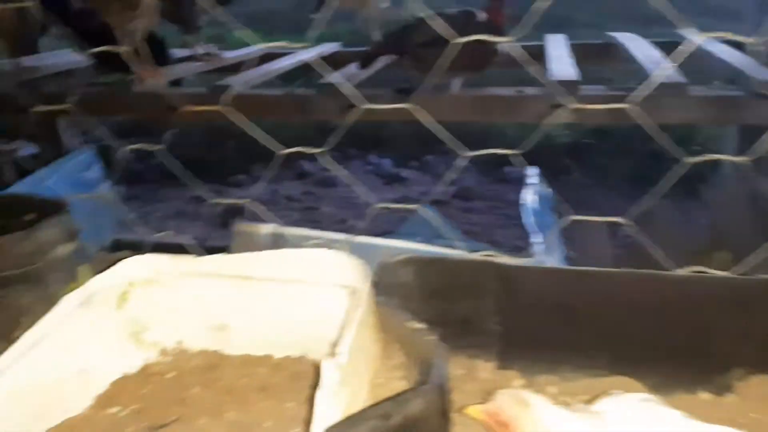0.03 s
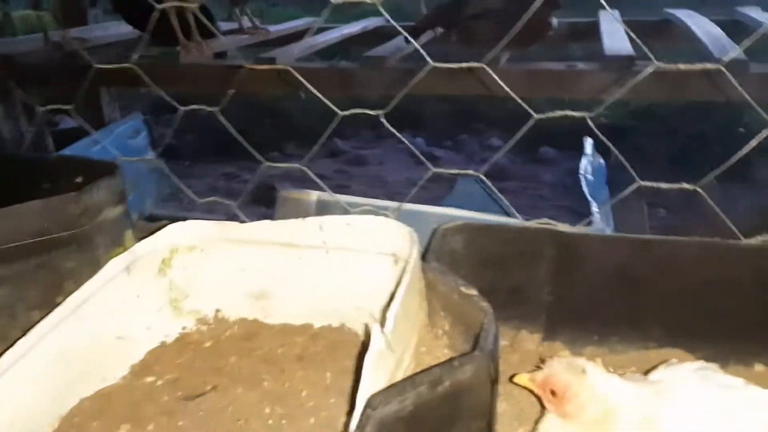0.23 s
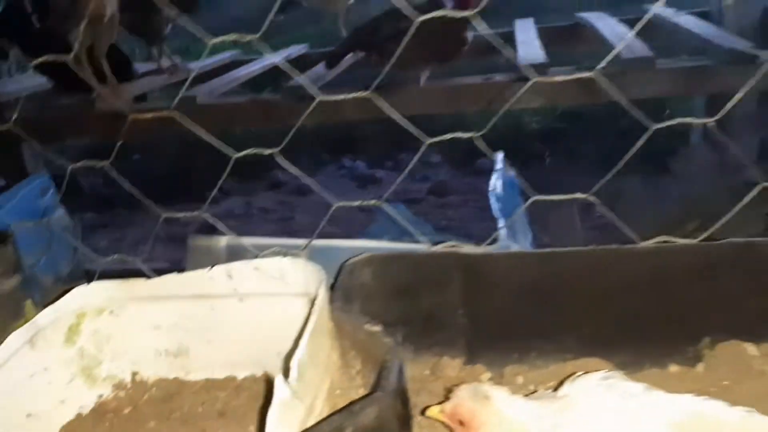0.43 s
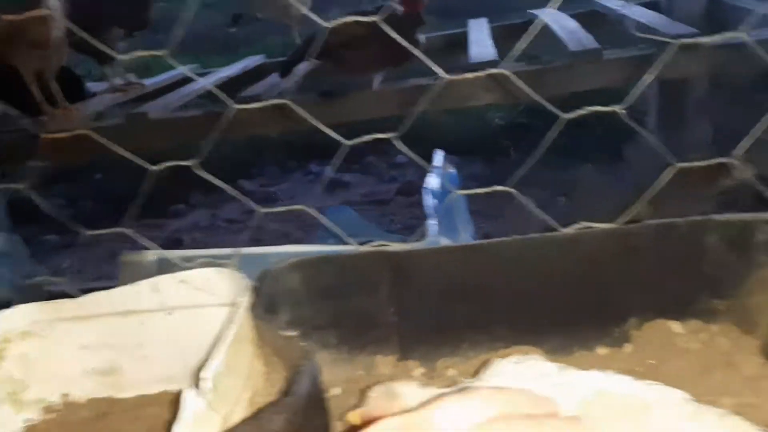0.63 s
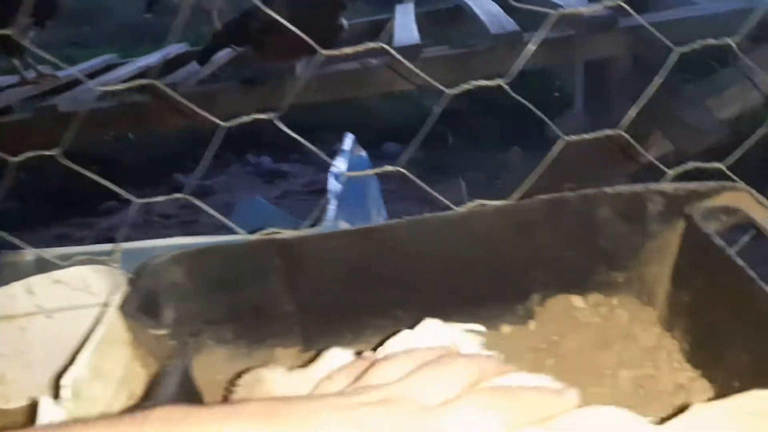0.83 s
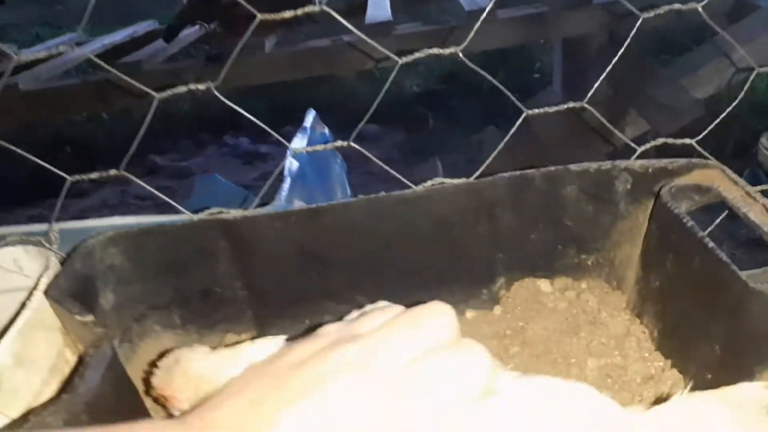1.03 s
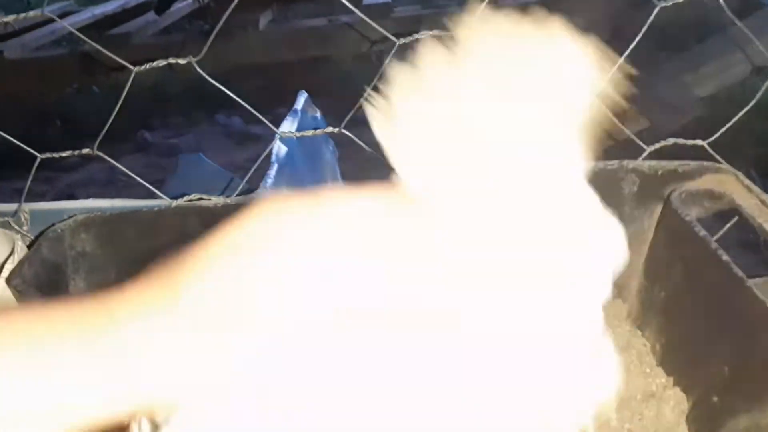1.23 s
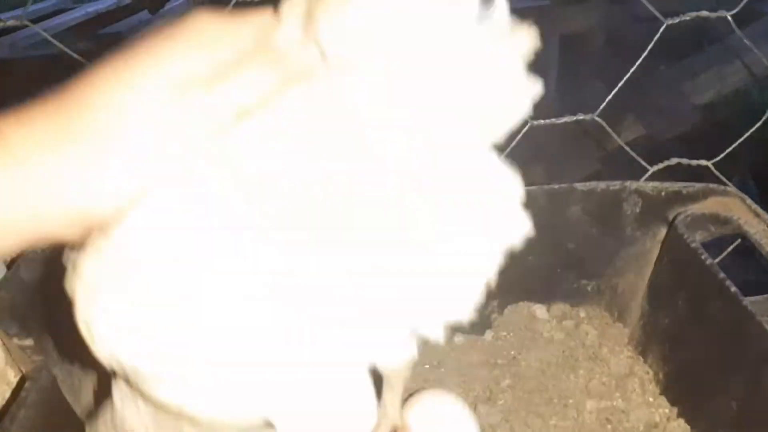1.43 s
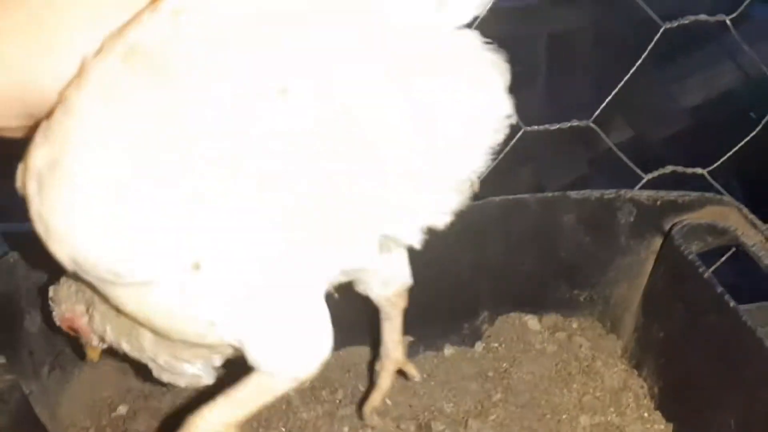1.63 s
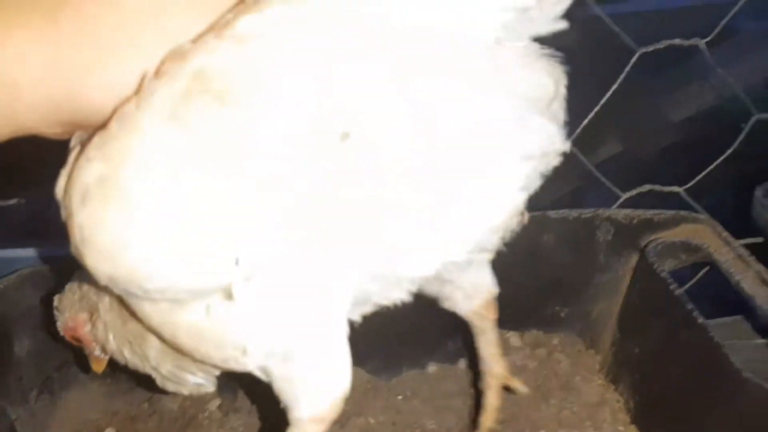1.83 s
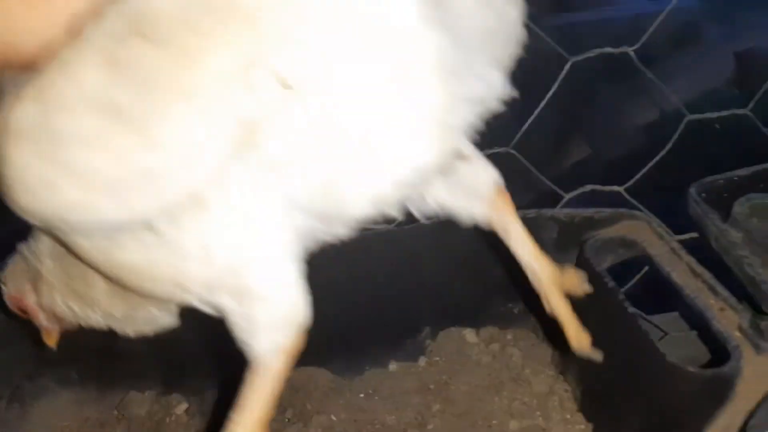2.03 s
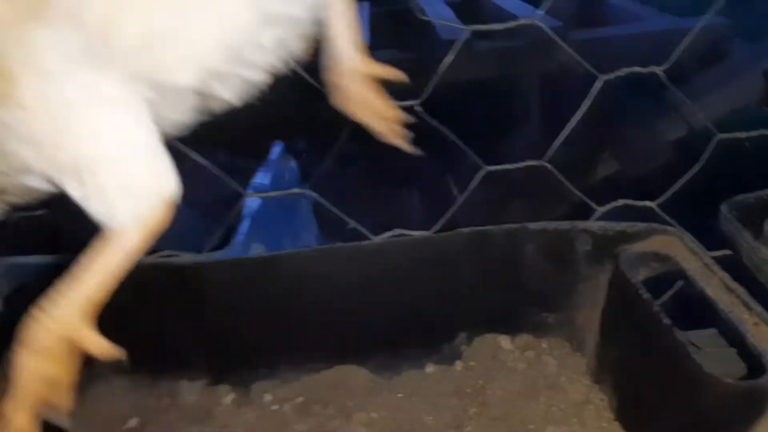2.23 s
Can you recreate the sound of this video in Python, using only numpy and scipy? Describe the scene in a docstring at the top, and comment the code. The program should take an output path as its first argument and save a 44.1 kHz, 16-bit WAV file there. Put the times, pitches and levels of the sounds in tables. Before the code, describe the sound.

A hen, close up: the tail of a low cluck on the left at 0 s, then a soft, high stuttering whine from 0.1 s, smoothing into a wavering moan until 1.0. Harsh, loud, lower trilling squawks burst out at 1.2-1.65 and 1.95-2.3. Litter rustles, strongest near 1.45, with low handling rumble, faint plastic knocks and grit ticks. Distant insects and a faint pulsing cricket surround the small, dry coop.

```python
"""A coop at night: a hen in a plastic nest tray whines in stutters, then squawks harshly twice as a hand pushes her.
Her voice is a stack of overtones on a pitch that dips about fifty times a second, with rasp and breath noise.
A low cluck ends nearby, made of two sine waves. Shaped noise makes the litter rustle and the handling rumble;
fading sine waves make the tray knock, and short noise bursts are grit.
Outside, noise bands make distant insects and air, and a pulsing narrow band is a nearer cricket."""
import sys
import numpy as np
from scipy import signal
from scipy.fft import rfft, irfft, next_fast_len
from scipy.io import wavfile
from scipy.ndimage import uniform_filter1d, map_coordinates

SR = 44100
rng = np.random.default_rng(int(sys.argv[2]) if len(sys.argv) > 2 else 0)


def to_wav(s):
    """Save 16-bit WAV."""
    ch = np.atleast_2d(s).T  # columns
    pcm = np.round(np.clip(ch, -1, 1) * 32767)  # PCM
    wavfile.write(sys.argv[1], SR, pcm.astype(np.int16))


N = 100503  # length in samples
TIME = np.arange(N) / SR  # seconds
TOP_HZ = 15830  # nothing sounds above this


def amp(db):
    """Turn decibels into a gain."""
    return 10 ** (np.asarray(db) / 20)


def unit(x):
    """Scale a sound to an rms level of 1."""
    return x / np.sqrt(np.mean(x ** 2) + 1e-20)


def along(points, hz):
    """Read a (frequency, value) table on a log axis; below its first point the value is 30 less."""
    f, v = np.transpose(points)
    return np.interp(np.log(hz + 1), np.log(f + 1), v, left=v[0] - 30)


def curves(rows):
    """One value per sample for each column after the time, joined by straight lines."""
    s, *columns = np.transpose(rows)
    return [np.interp(TIME, s, column) for column in columns]


def wobble(rate):
    """A smooth random curve with `rate` random points a second."""
    points = rng.standard_normal(int(N * rate / SR) + 4)
    return map_coordinates(points, [np.arange(N) * rate / SR])


def filtered(x, response):
    """Change the loudness of each frequency by a response curve."""
    m = next_fast_len(N + SR // 2)
    hz = np.fft.rfftfreq(m, 1 / SR)
    return irfft(rfft(x, m) * response(hz), m)[..., :N]


def noise(spectrum, alike=1):
    """Stereo noise of rms 1; alike is how much left resembles right (1 = the same)."""
    turn = np.arccos(np.clip(alike, -1, 1)) / 2
    shaped = filtered(rng.standard_normal((2, N)), lambda hz: amp(along(spectrum, hz)))
    mid, side = shaped * [[np.cos(turn)], [np.sin(turn)]]
    return unit(np.array([mid + side, mid - side]))


def placed(x, lag_ms, pan_db):
    """Place a sound sideways: the right side lags, and the left is louder by pan_db."""
    n, half = np.arange(N), lag_ms * SR / 2000
    left = map_coordinates(x, [n + half], mode="nearest")
    right = map_coordinates(x, [n - half], mode="nearest")
    return np.array([amp(pan_db / 2) * left, amp(-pan_db / 2) * right])


# Tone colour of the distant night: (frequency [Hz], level [dB])
NIGHT_COLOUR = [(240, -55), (400, 0), (620, -26), (3330, -20.5), (4600, -5.5), (5360, -4), (6750, -2.5),
                (8900, -24.5), (15000, -15), (15700, -14)]
# Slow rise of the night: (time [s], added level [dB])
NIGHT_SWELL = [(0, 0.5), (2.28, 4.5)]
NIGHT_DB = -58  # level before the swell


def distant_night():
    """Distant insects and air: unsteady noise, almost unrelated on the two sides."""
    swell_db, = curves(NIGHT_SWELL)
    return amp(NIGHT_DB + swell_db + 1.9 * wobble(27.36)) * noise(NIGHT_COLOUR, alike=0.033)


# Loudness of the nearer cricket: (time [s], level [dB])
CRICKET_LEVEL = [(.98, -73), (1.0, -57), (1.17, -56), (1.2, -74), (2.05, -56)]
CRICKET_HZ, CRICKET_WIDTH_HZ, PULSE_HZ = 6200, 40, 68.9  # pitch, spread to each side, pulses per second


def cricket():
    """A nearer cricket: a narrow band of noise opened and closed by regular pulses."""
    level_db, = curves(CRICKET_LEVEL)
    band = filtered(rng.standard_normal((2, N)),
                    lambda hz: np.exp(-((hz - CRICKET_HZ) / CRICKET_WIDTH_HZ) ** 2))
    pulses = np.cos(np.pi * PULSE_HZ * TIME) ** 2
    return amp(level_db) * unit(band * pulses)


# How long the walls ring: (frequency plus 300 [Hz], time to fall 60 dB [s])
COOP_RING = [(300, 0.17), (9000, 0.07)]


def coop(x):
    """The short answer of the coop walls: the sound smeared by noise whose treble fades sooner."""
    hz, t, grid = signal.stft(rng.standard_normal((2, SR // 4)), SR, nperseg=256)
    fall_s = np.abs(along(COOP_RING, hz + 300))[:, None]
    tail = signal.istft(grid * amp(-60 * t / fall_s), SR, nperseg=256)[1]
    later = np.pad(x, (130, 0))[None]  # the answer starts 130 samples late
    return signal.fftconvolve(later, tail / np.linalg.norm(tail[0]), axes=1)[:, :N]


# Movement in the tray: (time [s], litter level [dB], handling rumble level [dB])
RUSTLE_LEVELS = [(.06, -52.5, -65), (.75, -62, -66), (.85, -74, -70), (1.1, -55.5, -71.5),
                 (1.17, -59.5, -55), (1.25, -59, -67), (1.4, -47, -62), (1.47, -44, -54.5),
                 (1.66, -57.5, -60), (1.72, -79, -70.5), (2.0, -63, -73), (2.28, -53, -57)]
# Tone colour of the litter: (frequency [Hz], level [dB])
LITTER_COLOUR = [(150, -35), (260, -2.5), (380, 0), (600, -6), (1200, -10), (3000, -22.5)]
# Tone colour of the handling rumble: (frequency [Hz], level [dB])
RUMBLE_COLOUR = [(25, -45.5), (70, -3), (150, -6.5), (400, -35.5)]
TRAY_ALIKE = .85  # left-right likeness


def rustle():
    """Feet and hand shift the litter: unsteady mid-range noise over a low rumble."""
    litter_db, rumble_db = curves(RUSTLE_LEVELS)
    litter = amp(litter_db + 3.6 * wobble(39.804)) * noise(LITTER_COLOUR, TRAY_ALIKE)
    rumble = amp(rumble_db + 2.6 * wobble(12.66)) * noise(RUMBLE_COLOUR, TRAY_ALIKE)
    return litter + rumble


# Soft knocks on the tray: (time [s], relative level [dB])
KNOCKS = [(0.767, -46), (1.161, -52.5), (1.429, -41.5), (1.864, -51)]
# Ringing tones of the plastic: (frequency [Hz], average level [dB], time to fall 60 dB [s])
TRAY_TONES = [(255, -1, 0.078), (331, 7, 0.071), (418, -4, 0.17)]
# Grit flicked on plastic: (time [s], relative level [dB])
TICKS = [(1.6116, -29), (1.6746, -42)]


def knocks_and_grit():
    """Knocks ring the tray's own tones, freshly balanced each time; grit is fast-fading noise."""
    hits, t = np.zeros(N + SR), np.arange(SR // 8) / SR
    for start, db in KNOCKS:
        ring = np.zeros(len(t))
        for hz, tone_db, fall_s in TRAY_TONES:
            ring += amp(tone_db + rng.normal(0, 2) - 60 * t / fall_s) * np.sin(2 * np.pi * hz * t)
        soft_start = 1 - np.exp(-t / 0.0021)
        hits[round(start * SR):][:len(t)] += amp(db - 2) * ring * soft_start
    for start, db in TICKS:
        hits[round(start * SR):][:len(t)] += amp(db - 9.5 - 60 * t / 0.024) * rng.standard_normal(len(t))
    return hits[:N]


def tray():
    """Everything in the tray, 6 dB louder on the left."""
    return (rustle() + knocks_and_grit()) * amp([[3], [-3]])


# The end of a low cluck: (time [s], pitch [Hz], level of the lowest tone [dB])
CLUCK = [(0, 374, -28.5), (.022, 375.7, -28), (.034, 376, -37.5), (.05, 372, -52)]
# From the second harmonic up: (level against the lowest tone [dB], change after 10 ms [dB per ms])
CLUCK_OVERTONES = [(-9, -1.4)]


def cluck():
    """The end of a low cluck, on the left; its overtone dies first."""
    hz, db = curves(list(CLUCK) + [(.2, 372, -90)])
    phase = 2 * np.pi * np.cumsum(hz) / SR
    late_ms = np.clip(TIME * 1000 - 10, 0, 100)
    tone = np.cos(phase)
    for k, (over_db, fade) in enumerate(CLUCK_OVERTONES, start=2):
        tone = tone + amp(over_db + fade * late_ms) * np.cos(k * phase)
    return placed(np.sqrt(2) * amp(db) * tone, lag_ms=.3, pan_db=15)


# Bursts of voice: (start [s], turning moment [s], end [s], level at the turn [dB], level at the end [dB])
BURSTS = [(0.096, 0.121, 0.12, -34.5, -40), (0.143, 0.158, 0.17, -33, -38), (0.196, 0.209, 0.23, -43, -46),
          (0.246, 0.269, 0.277, -39.5, -39.5), (.303, 0.305, 0.3343, -37, -37),
          (0.363, 0.379, 0.38, -33, -36), (0.409, 0.43, .44, -34, -40.5),
          (0.461, 0.467, 0.49, -39.5, -37.5), (0.498, 0.526, 0.62, -32, -42.5),
          (0.603, 0.625, 0.72, -41.5, -39.5), (0.718, 0.85, 0.94, -38, -40.5),
          (0.93, 0.975, 1.011, -37.5, -41.5), (1.211, 1.23, 1.2526, -18.5, -16.5),
          (1.255, 1.265, 1.295, -25.5, -39.5), (1.294, 1.316, 1.334, -20.5, -26),
          (1.358, 1.376, 1.39, -19.5, -30), (1.402, 1.422, 1.432, -20.5, -28.5),
          (1.443, 1.473, 1.54, -27, -29), (1.574, 1.583, 1.585, -27, -39),
          (1.597, 1.606, 1.662, -29, -33.5), (1.94, 1.962, 1.978, -19.5, -27.5),
          (1.997, 2.018, 2.03, -21.5, -21.5), (2.033, 2.068, 2.292, -25.5, -31.5)]
START_UNDER_DB, EDGE_S, FADE_DB_PER_S = 10.5, 0.0034, 1099  # start below the turn; fade-in; fall after end


def effort():
    """How hard she calls: each burst rises to a turning level, glides to its end level and fades fast."""
    gain = np.zeros(N)
    for start, turn, end, turn_db, end_db in BURSTS:
        db = np.interp(TIME, [start, turn, end], [turn_db - START_UNDER_DB, turn_db, end_db])
        db = db - FADE_DB_PER_S * np.clip(TIME - end, 0, None)
        gain = np.maximum(gain, amp(db) * np.clip((TIME - start) / EDGE_S, 0, 1))
    return gain


# Trill, each row until the next: (first dip [s], dips per second [Hz], narrowness, abruptness of the flip)
TRILL = [(.223, 49.92, 2.74, 1), (1.267, 49.36, 1.4, 2), (1.366, 47.3, 1.4, 1.9), (1.452, 48.16, 1.2, 1.18),
         (1.997, 50.1, 1.345, 1.135)]
DIP_SKEW = .3  # makes the dips lopsided: slow fall, quick rise


def trill():
    """The pitch pattern of the trill: 0 at the top of each arch, 1 in the dip."""
    starts, rates, narrow, flip = np.transpose(TRILL)
    row = np.clip(np.searchsorted(starts, TIME) - 1, 0, None)
    turn = np.pi * (TIME - starts[row]) * rates[row]
    arch = np.abs(np.cos(turn + DIP_SKEW * np.sin(turn) ** 2)) ** (2 * narrow[row])
    return np.clip(.5 + flip[row] * (arch - .5), 0, 1)


# Path of the pitch: (time [s], top pitch before cracks and drift [Hz], share lost in a trill dip)
PITCH = [(.095, 1303, 0.045), (.104, 1061, 0.0056), (.116, 1088, 0.0026), (.125, 786, 0.026),
         (.147, 1288, 0.0098), (.154, 1638, 0.017), (.161, 1057, 0.035), (.173, 1053, 0.014),
         (.181, 822, 0.0061), (.2, 1782, 0.42), (.25, 1607, 0.28), (.32, 1624, .35), (.49, 1620, 0.32),
         (.565, 1822, 0.18), (.61, 1724, 0.14), (.66, 1623, 0.08), (.72, 1516, 0.068), (.82, 1609, 0.037),
         (.95, 1542, 0.23), (.995, 1495, 0.27), (1.005, 1403, 0.43), (1.03, 1296, 0.23), (1.21, 960, 0.017),
         (1.219, 1045, 0.0033), (1.227, 1042, 0.011), (1.232, 1189, 0), (1.243, 1146, 0.01),
         (1.248, 1043, 0.02), (1.259, 1027, 0), (1.264, 898.7, .22), (1.295, 960.4, 0.26),
         (1.312, 1007, 0.28), (1.45, 945.7, 0.29), (1.49, 949.3, 0.079), (1.53, 919, 0.26),
         (1.565, 1079, 0.2), (1.65, 1031, 0.32), (1.69, 980, 0.3), (1.94, 1013, 0.0093),
         (1.966, 1002, 0.028), (1.976, 874, 0.015), (2.0, 921.6, 0.17), (2.045, 885.8, 0.33),
         (2.09, 932.7, 0.3), (2.15, 917.4, 0.36), (2.185, 1078, 0.33), (2.278, 1001, 0.33)]
# Moments when the whine cracks upward: time [s]
CRACKS = [.613, .736]
CRACK_HZ, CRACK_S, WANDER = 280, .005, 0.01182  # jump up before the dips; half length; random drift share


def pitch(dip):
    """Her pitch in Hz: a path with upward cracks, trill dips and a small random drift."""
    top_hz, depth = curves(PITCH)
    for moment in CRACKS:
        top_hz = top_hz + CRACK_HZ * np.exp(-((TIME - moment) / CRACK_S) ** 2)
    return uniform_filter1d(top_hz * (1 - depth * dip), size=90) * (1 + WANDER * wobble(90))


# Tone colour of the beak: (frequency [Hz], level [dB])
BEAK = [(300, -11), (800, 5), (1150, 4.5), (2200, -1.5), (2600, 1), (3000, -10), (3400, -6), (4100, -22.5),
        (6500, -44)]
# Tone colour of the treble edge: (frequency [Hz], level [dB])
HISS = [(3500, -22.5), (4150, 2), (5100, -3), (9000, -19), (12500, -14)]
# Colour over time: (time [s], overtone slope [dB per octave], treble edge against the voice [dB],
# mouth resonance [Hz])
TIMBRE = [(.18, 6.5, -14.5, 1910), (.21, -3.5, -18, 1510), (.32, -11, -18, 1580), (.49, -12, -27, 1600),
          (.52, -4, -40, 1685), (.6, -1, -45, 1600), (.87, -5, -41, 1520), (.89, -13, -9.5, 1450),
          (1.03, -19, -16.5, 1400), (1.21, 8, -17.5, 2150), (1.27, -3, -22, 2206), (1.33, 4.5, -16.5, 1550),
          (1.5, 2, -5.5, 1475), (1.56, 1, -21.5, 1506), (1.69, -4.5, -26.5, 1504), (1.96, -3, -13.5, 1938),
          (2.02, 0, -22, 1520), (2.1, -2.5, -24, 1300), (2.28, -8.5, -51, 1280)]
# Roughness over time: (time [s], level of lines at half-pitch steps [dB], roughness 0 to 1)
ROUGH = [(.1, -10, .4), (.18, -20, .15), (.32, -6, .08), (.49, -9, .08), (.52, -30, .03), (.87, -38, .02),
         (.89, -3, .06), (1.03, 0, .1), (1.21, -12, .3), (1.3, -18, .15), (1.96, -25, .1), (2.28, -16, .15)]
MOUTH_WIDTH_HZ, MOUTH_DB = 194, 11.5  # the moving resonance of the open mouth
HALF_SWING_DB = 16  # the half-pitch lines are this much stronger in a dip than on top
FLICKER_DB, FLICKER_HZ = 3.5, 70  # size and speed of each overtone's own swelling
JITTER = .6  # phase shake at roughness 1 [radians]
RASP_DB, AIR_DB = -8, -6  # rasp at roughness 1 outside a dip; breath against the treble edge
DIP_GAIN_DB, UNSTEADY_DB = 1.5, 1.6  # extra level in a dip; random level scatter


def hen():
    """Overtones of a trilling pitch light up at beak and mouth resonances; each cycle gates rasp and breath."""
    tilt_db, edge_db, mouth_hz = curves(TIMBRE)
    half_db, rough = curves(ROUGH)
    rough = np.clip(rough, 0, 1)
    dip = trill()
    hz = pitch(dip)
    phase = 2 * np.pi * np.cumsum(hz) / SR + JITTER * rough * wobble(500)

    k = np.arange(1, 21)[:, None] / 2  # multiples of the pitch, in half steps
    line_hz = k * hz
    line_db = (k % 1 > 0) * (half_db + HALF_SWING_DB * (dip - 0.5))
    flicker = np.array([wobble(FLICKER_HZ) for _ in k])
    line_db = line_db + FLICKER_DB * flicker * (k > 1)
    mouth_db = MOUTH_DB / (1 + ((line_hz - mouth_hz) / MOUTH_WIDTH_HZ) ** 2)
    body = amp(along(BEAK, line_hz) + mouth_db + tilt_db * np.log2(np.maximum(k, 1)) + line_db)
    # Even out the body's strength, so that effort() sets the level
    strength = uniform_filter1d(np.sqrt(np.sum(body ** 2, axis=0) / 2), size=2000)
    edge = amp(edge_db + along(HISS, line_hz) + line_db)
    gains = (body / strength + edge) * (line_hz < TOP_HZ)
    tone = np.sum(gains * np.sin(k * phase + k ** 2), axis=0)

    gate = 1 + np.cos(phase)  # opens once per cycle of the pitch
    rasp = amp(RASP_DB + 5.9 * dip) * np.sqrt(rough) * unit(gate * noise(BEAK)[0])
    air = amp(edge_db + AIR_DB) * unit(gate * noise(HISS)[0])
    level = effort() * amp(DIP_GAIN_DB * dip + UNSTEADY_DB * wobble(70))
    voice = level * (tone + rasp + air)
    return filtered(voice, lambda hz: 1 / (1 + (330 / (hz + 1)) ** 6))  # no low rumble in her voice


# Where the hen is heard: (time [s], right side lags by [ms], left louder than right by [dB])
SIDEWAYS = [(.1, 0.045, -.5), (1.0, 0.12, 3), (1.2, 0.31, 1), (2.28, 0.31, 3.5)]
COOP_DB = -11.5  # wall answer against the voice


def scene():
    """Night, tray and cluck around the hen and the answer of the walls to her voice."""
    voice = hen()
    background = distant_night() + cricket() + tray() + cluck()
    return background + amp(COOP_DB) * coop(voice) + placed(voice, *curves(SIDEWAYS))


def record(dry):
    """Cut everything above the top frequency and thin out the deepest bass."""
    return filtered(dry, lambda hz: (hz < TOP_HZ) / (1 + (50 / (hz + 1)) ** 3))


dry = scene()
out = record(dry)
to_wav(out)
```